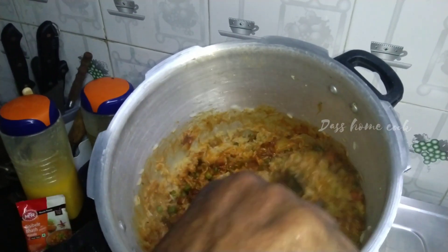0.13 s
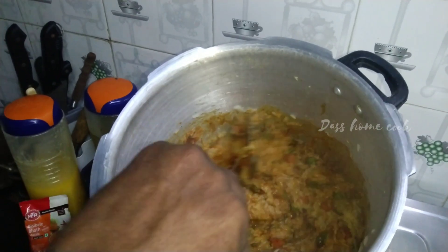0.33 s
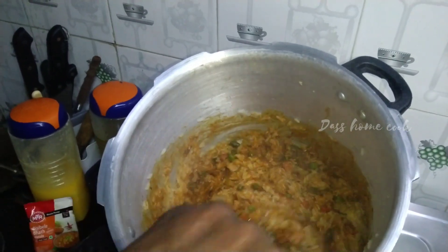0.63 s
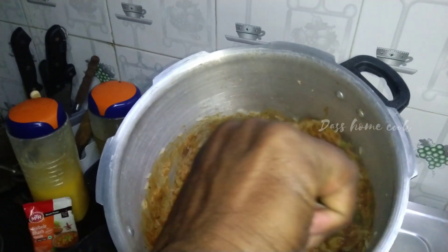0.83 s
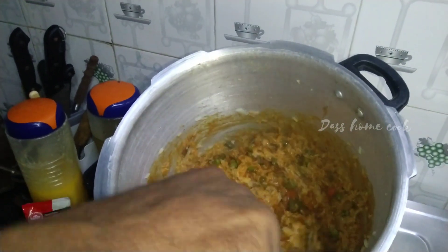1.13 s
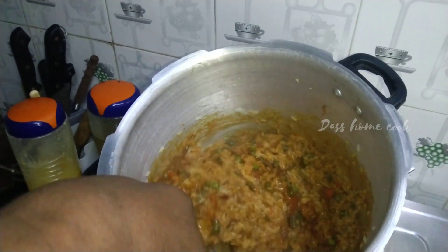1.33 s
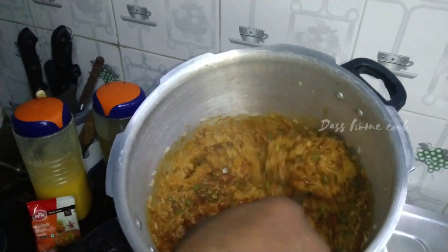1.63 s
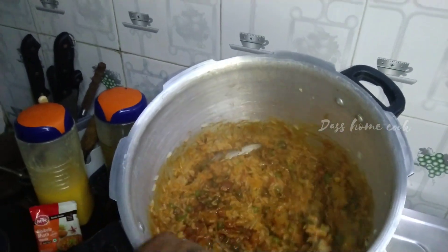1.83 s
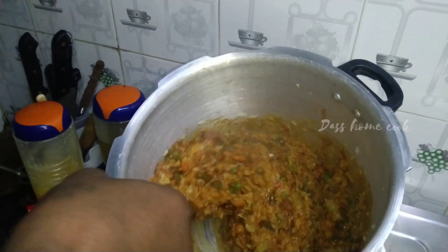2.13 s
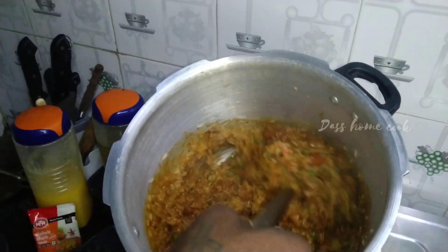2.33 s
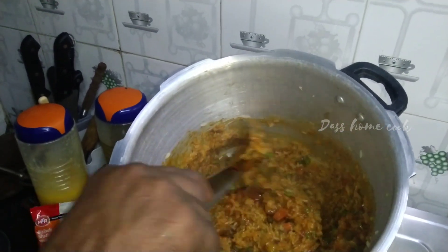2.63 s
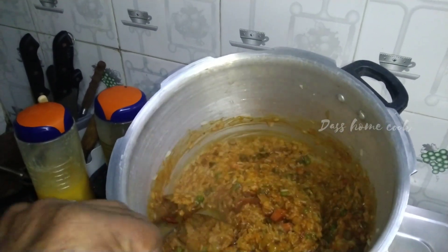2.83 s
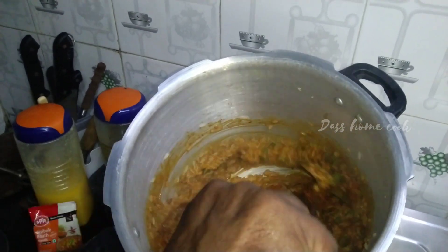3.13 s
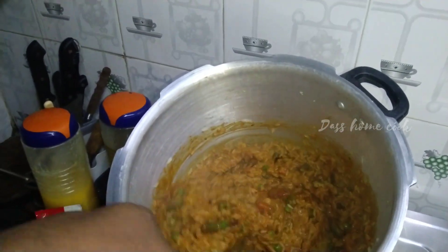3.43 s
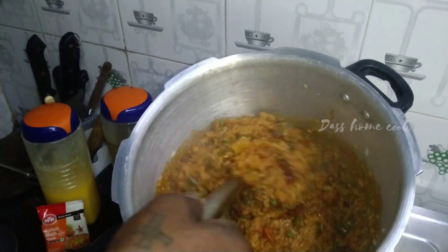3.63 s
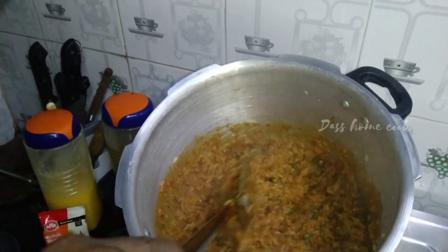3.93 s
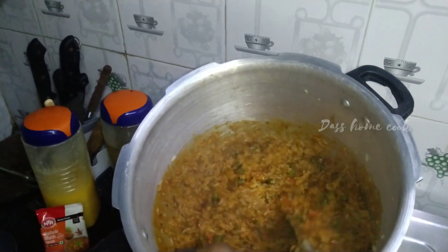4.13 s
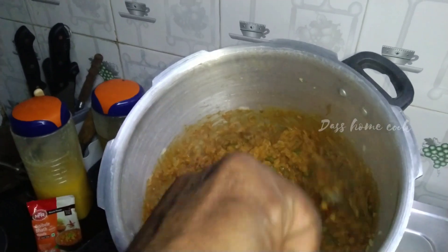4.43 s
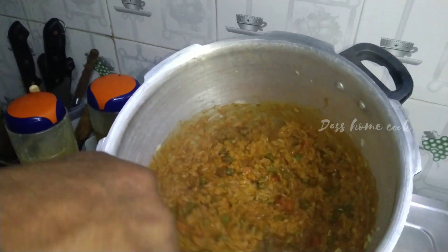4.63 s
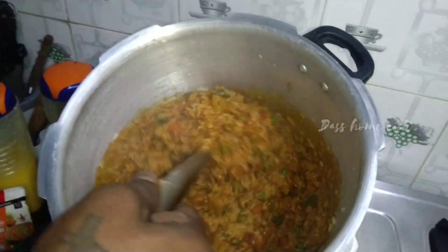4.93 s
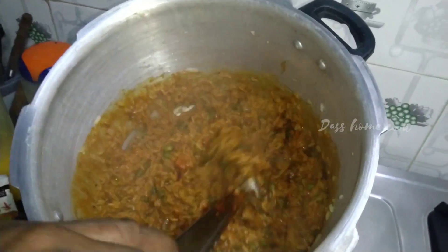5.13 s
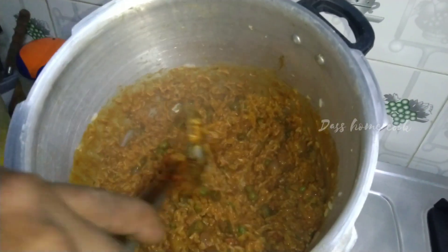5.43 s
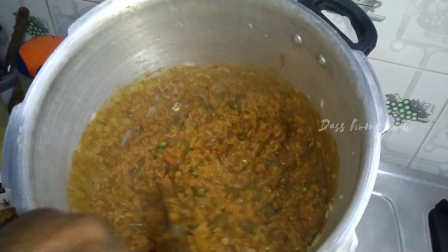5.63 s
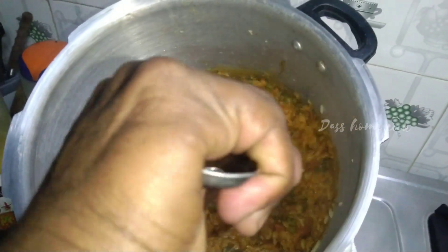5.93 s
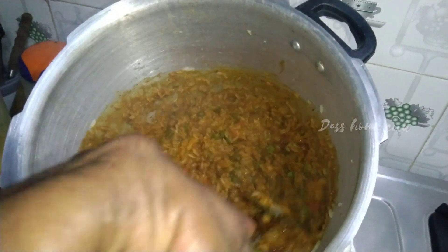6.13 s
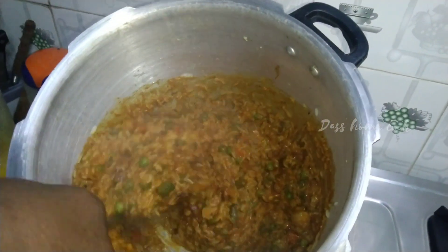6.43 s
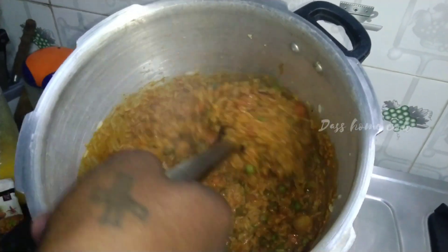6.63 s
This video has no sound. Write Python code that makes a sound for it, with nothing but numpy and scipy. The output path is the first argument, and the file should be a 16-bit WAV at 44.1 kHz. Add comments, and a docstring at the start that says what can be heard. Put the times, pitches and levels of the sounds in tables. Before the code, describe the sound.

Close by, a spoon pushes and scrapes through a moist rice mixture in a metal pot, striking the sides several times a second with short, damped clanks. Some strokes draw brief wavering tones from the pot, and the food pops faintly. The stirring eases for a moment near the end, around two very faint far crow caws, then resumes firmly. A low hum and slight buzz fill the small kitchen.

```python
"""A steel spoon stirs thick wet rice in an aluminium cooker pot, heard close by in a quiet kitchen.
Impact and friction excite the modes of the pot as the spoon knocks and drags along wall and bottom;
the food damps them, so they die fast. Soft slips of the spoon ring the low modes in short, wavering
tones, and air pockets pop between grains. Behind lie a low hum and a faint electric buzz,
and a far crow caws twice."""
import sys
import numpy as np
from scipy import signal
from scipy.fft import rfft, irfft, next_fast_len
from scipy.io import wavfile
from scipy.ndimage import uniform_filter1d, map_coordinates

SR = 44100
rng = np.random.default_rng(int(sys.argv[2]) if len(sys.argv) > 2 else 0)


def dump(signal):
    """Clip the signal to [-1, 1] and save it as 16-bit WAV at the path in sys.argv[1]."""
    limited = np.clip(np.atleast_2d(signal).T, -1, 1)
    pcm = np.round(limited * 32767).astype(np.int16)
    wavfile.write(sys.argv[1], SR, pcm)


N = 298539

# Modes of the loaded pot. Each row: frequency in Hz, relative level in dB, nominal t60 in seconds.
POT_MODES = [(276, -12, 0.035), (316.5, -6, 0.12), (425.3, -1.5, 0.21), (465, -6, 0.13),
             (489.5, -2.5, 0.12), (619, -4.5, 0.11), (690, -4.5, 0.12), (783, -5, 0.12),
             (850.5, -0.5, 0.096), (981, -0.5, 0.065), (1073, 1.5, 0.091), (1255, -8, 0.085),
             (1456, -3.5, 0.061), (1618, -8.5, 0.094), (1930, -2.5, 0.04), (2220, -2, 0.045),
             (2400, -2.5, 0.025), (2620, -2.5, 0.032), (2900, -4, 0.04), (3197, -5.5, 0.038),
             (3506, -5.5, 0.04), (3990, -13.5, 0.044)]


def amp(db):
    """Decibels as an amplitude ratio."""
    return 10 ** (np.asarray(db) / 20)


def unit(x):
    """Normalisation to unit RMS."""
    return x / np.sqrt(np.mean(x ** 2) + 1e-20)


def along(points, hz):
    """Interpolation of (Hz, value) points on a logarithmic frequency axis."""
    f, v = np.transpose(points)
    return np.interp(np.log(hz + 1), np.log(f + 1), v)


def wobble(rate):
    """Smooth random modulation: a spline through rate knots a second."""
    return map_coordinates(rng.standard_normal(int(N * rate / SR) + 4), [np.arange(N) * rate / SR])


def filtered(x, response):
    """Linear filtering: the spectrum of x times a frequency response."""
    size = next_fast_len(N + 8192)
    return irfft(rfft(x, size) * response(np.fft.rfftfreq(size, 1 / SR)), size)[:N]


def room(air_db=-48.5, hum_db=-54.0, hum_hz=96):
    """Ambient noise: bass-heavy kitchen air and a hum modulated in frequency and amplitude."""
    # Each row: frequency in Hz, relative spectral density in dB.
    air_spectrum = [(12, -52), (20, 7.5), (104, 6), (196, 3.5), (521, 1.5), (935, -8.5), (1110, -9),
                    (1680, -14), (1980, -11), (4210, -23.5), (9190, -25.5), (15600, -31.5)]
    air = unit(filtered(rng.standard_normal(N), lambda hz: amp(along(air_spectrum, hz))))
    hum = np.sin(2 * np.pi * np.cumsum(hum_hz + 11 * wobble(12)) / SR) * amp(hum_db + 3.9 * wobble(7))
    return amp(air_db + 0.2 * wobble(2.27)) * air + hum


def electric_buzz(rate_hz=122, level_db=-66):
    """A nearly periodic impulse train, high-passed to thin treble ticks, is heard as a buzz."""
    cycles = np.cumsum(rate_hz * (1 + 0.055 * wobble(2.7))) / SR
    ticks = np.diff(np.floor(cycles), prepend=0) * amp(1.5 * rng.standard_normal(N))
    return amp(level_db) * unit(filtered(ticks, lambda hz: hz ** 2 / (hz ** 2 + 8000 ** 2)))


def knocks(spot_gain_db=13, spot_octaves=0.054, lasting_share=0.088):
    """Impact excitation: a blow cracks and sets all modes ringing, weighted by the spot it strikes."""
    # Each row: start in seconds, relative level of the low boom in dB, middle clank and high clink
    # in dB relative to the boom, frequency favoured by the struck spot in Hz.
    blows = [(0.008, -10.5, -4.5, -6.5, 479), (0.285, -12.5, -5.5, -14.5, 441), (0.406, -21, -9.5, 3, 980),
             (0.606, -24.5, -7.5, 5, 1465), (0.683, -29, 0.5, -9, 1560), (1.073, -26.5, -1, -21, 1596),
             (1.188, -7.5, -4.5, -29, 407.4), (1.561, -15, -17, -21, 405), (1.679, -25, 7, -1, 690),
             (1.93, -29, -3, 3.5, 1486), (2.004, -9.5, -26, -23, 405), (2.139, -12, -5.5, -15.5, 454),
             (2.419, -19.5, 6, -10.5, 467), (2.632, -50, 16, 8, 2210), (2.933, -38, -7, -11, 442),
             (2.956, 0, -7, -12, 506.6), (3.035, -22.5, -11, -24, 443), (3.213, -24.5, -3, -14, 496),
             (3.436, -22.5, -10.5, -13, 420), (3.563, -13.5, -15, -17, 867), (3.794, -12, -4, -27.5, 469),
             (4.118, -26.5, -2.5, 3, 2620), (4.183, -15, -7.5, -16, 412), (4.475, -37.5, -4, -4, 2180),
             (4.552, -12, 0.5, -15.5, 465), (5.049, -13.5, -15, -9.5, 463), (5.075, -31, 3, -6, 464),
             (5.112, -35, 5, -4, 1290), (5.137, -38.5, 10.5, -1, 1460), (5.301, 3.5, -13, -13.5, 980),
             (5.788, -13, -17, -14, 850), (5.855, -28.5, -39, -1, 2880), (6.096, -43.5, -6, 4.5, 436),
             (6.117, -10.5, 4, 3.5, 2130), (6.184, -6.5, -10, -31, 450.4), (6.504, -17, -10.5, -9.5, 2700),
             (6.626, -0.5, -12, -17.5, 492.3), (6.692, -18.5, -7, -4, 485), (6.739, -27, 3, -3, 1500)]
    out, t = np.zeros(N + SR), np.arange(SR // 5) / SR
    hz, db, t60 = np.transpose(POT_MODES)[:, :, None]
    attack = (1 - np.exp(-t / 0.00045)) ** 2
    for start, boom_db, clank_db, clink_db, spot_hz in blows:
        crack_db = -25.5 + 0.76 * clink_db
        spectrum = [(500, 0.015), (900, clank_db + 4), (2500, clink_db + 11), (7000, crack_db + 19)]
        near_spot = np.exp(-(np.log2(hz / spot_hz) / spot_octaves) ** 2)
        mode_db = db + along(spectrum, hz) + spot_gain_db * near_spot
        # Every blow differs; the shifting food detunes the modes.
        scatter_db, phase, detune = (spread * rng.standard_normal(hz.shape) for spread in (2, .5, .015))
        partials = amp(mode_db + scatter_db) * np.sin(2 * np.pi * hz * (1 + detune) * t + phase)
        # The food absorbs most of the blow at once; a hard blow presses the spoon on and damps more.
        quick_t60 = 0.54 * t60 * amp(-0.06 * (boom_db + 9.5))
        lasting = lasting_share * (1 + 1.2 * near_spot) * amp(-60 * t / (0.65 * t60))
        ring = np.sum((amp(-60 * t / quick_t60) + lasting) * partials, axis=0)
        crack = signal.lfilter([1.3, 1.05, 0.26, -0.48, -1.44], [1, -.9, .3], rng.standard_normal(len(t)))
        crack *= amp(crack_db + 4 - 60 * t / 0.045)
        snap = signal.lfilter([1, 1, -1, -1], 2, rng.standard_normal(len(t)))  # steel meets metal
        snap *= amp(crack_db + 18.5 - 60 * t / .007)
        out[round(start * SR):][:len(t)] += amp(boom_db - 9.5) * (ring + crack + snap) * attack
    return out[:N]


def grit(slips_per_s, lumpy_db):
    """Rough contact acts as a dense random train of tiny slips whose strength comes in lumps."""
    return (rng.random(N) < slips_per_s / SR) * amp(lumpy_db * (wobble(40) + wobble(150)))


def mode(force, hz, t60):
    """Forced response of one damped harmonic oscillator."""
    radius, angle = amp(-60 / (t60 * SR)), 2 * np.pi * hz / SR
    return signal.lfilter([0, radius * np.sin(angle)], [1, -2 * radius * np.cos(angle), radius ** 2], force)


def patchy(x, depth_db):
    """Spectral modulation: patches swell and fade as wet grit comes and goes under the edge."""
    spectra = signal.stft(x, nperseg=512)[2]
    field = uniform_filter1d(rng.standard_normal(spectra.shape), size=5, axis=0)
    field = uniform_filter1d(field, size=5, axis=1)
    return signal.istft(spectra * amp(depth_db * unit(field)), nperseg=512)[1][:N]


def contact_power(rows, touch_s=0.014, lift_s=0.017):
    """Incoherent contacts add in power; returns envelopes of a main sound and its companion."""
    power, t = np.zeros((2, N)), np.arange(N) / SR
    for start, length, db, change_db, companion_db in rows:
        touch = np.clip((t - start) / touch_s + 1, 0, 1)
        lift = np.clip((start + length - t) / lift_s + 1, 0, 1)
        level_db = db + change_db * np.clip((t - start) / length, 0, 1)
        power += (touch * lift * amp(level_db + [[0], [companion_db]])) ** 2
    return power


def contact_gains(scrape_drag_db=-10.5):
    """Friction needs contact: the gains of boom, drag, edge and rasp vanish when the spoon lifts."""
    # The spoon pushes through the mass. Each row: start and length in seconds, boom level at touch
    # in dB, its change by the end in dB, drag in dB relative to the boom.
    pushes = [(.045, 0.22, -30.5, -31.5, 2.5), (.305, 0.05, -16.5, -25, -12), (.42, 0.058, -44, -6, 0),
              (.62, 0.043, -26.5, -20, -8), (.685, 0.17, -35.5, -16, -0.5), (1.075, 0.12, -45, 2, -2.5),
              (1.21, 0.2, -30, -9.5, -6), (1.395, .15, -35, -6.5, -0.5), (1.58, 0.11, -21, -20, -11),
              (1.685, 0.052, -29.5, 0, -0.5), (1.92, 0.089, -37, -11, -2), (2.012, 0.14, -34.5, -6.5, -2),
              (2.135, 0.13, -32, -3.5, -5), (2.31, 0.068, -25.5, -3.5, -12.5),
              (2.425, 0.27, -36, -19.5, -6), (2.65, 0.17, -50.5, 8.5, 8.5), (2.98, 0.11, -50, -14, 11),
              (3.07, 0.078, -39, 3.5, -2), (3.213, 0.082, -35.5, -24, 2.5), (3.29, 0.11, -43.5, -14, -2),
              (3.4, .11, -52.5, 14.5, 1.5), (3.575, 0.19, -45, 14.5, -6.5), (3.794, 0.11, -30.5, -26, -9),
              (4.135, 0.056, -31.5, -11, -5), (4.19, 0.08, -32, -21, -4.5), (4.485, 0.043, -34, -9, -1),
              (4.565, 0.36, -33.5, -1.5, -6.5), (4.92, 0.077, -46.5, 24, -10.5),
              (5.005, 0.33, -41.5, -28, 0.5), (5.33, 0.092, -40.5, -5, -3.5), (5.8, 0.063, -46, 11.5, 1),
              (6.13, 0.027, -20, -28, -22), (6.2, 0.29, -31.5, -3.5, -7), (6.52, 0.023, -28.5, -11, -4.5),
              (6.64, 0.058, -26.5, -6, -6), (6.695, 0.036, -34, -10.5, 4), (6.755, .03, -34.5, 3, 10)]
    # Its edge scrapes bare metal. Each row: start and length in seconds, edge level at touch in dB,
    # its change by the end in dB, rasp in dB relative to the edge.
    scrapes = [(.05, 0.17, -40, -15, -5), (.305, 0.14, -46.5, -15, -6.5), (.415, 0.049, -41, -4.5, -2),
               (.62, 0.067, -54, 4, -17), (.685, 0.055, -42.5, 1.5, -10.5), (.755, 0.1, -54.5, -5.5, -5),
               (1.075, 0.084, -46, 11, -6.5), (1.175, .19, -35, -3.5, -7.5), (1.375, 0.13, -43.5, -12, -11),
               (1.46, 0.08, -41.5, -2.5, -8), (1.575, 0.076, -46, -3, -7), (1.685, 0.056, -36.5, -3, -11.5),
               (1.92, 0.065, -37.5, -13, -8), (2.015, 0.1, -39.5, 3, -14.5),
               (2.135, .16, -36.5, -5.5, -7.5), (2.33, 0.048, -46, 9, -8.5),
               (2.425, 0.19, -42.5, -24, -7.5), (2.64, 0.17, -32.5, 0.5, -7.5),
               (3.03, 0.15, -43, -7.5, -7.5), (3.215, 0.048, -46, -5.5, -5.5),
               (3.285, 0.069, -40, -9, -3.5), (3.39, .12, -44.5, 7, -10.5), (3.575, 0.19, -45.5, -1.5, -9),
               (3.794, 0.047, -37.5, -17, -8), (4.13, 0.096, -35.5, -13.5, -12),
               (4.485, 0.054, -38, 3, -9.5), (4.565, 0.36, -36.5, -3, -7.5), (4.93, 0.19, -43, -10, -7.5),
               (5.8, 0.059, -44, 6, -14.5), (6.13, 0.058, -29.5, -7.5, -11.5), (6.2, 0.31, -36.5, -4, -7),
               (6.52, 0.02, -38, -1, -20), (6.645, 0.075, -46, 4.5, -12), (6.755, .03, -37.5, -11, -8)]
    boom, drag = contact_power(pushes)
    edge, rasp = contact_power(scrapes)
    drag += edge * amp(scrape_drag_db) ** 2  # a scrape shakes the middle modes too
    return np.sqrt([boom, drag, edge, rasp])


def strokes():
    """Friction excitation: pushing drives the low modes, dragging the middle, the rasping edge the high."""
    # Where the edge rings best as its angle changes. Each row: time in seconds, frequency in Hz.
    edge_path = [(.05, 2860), (.7, 2750), (1.08, 2400), (1.33, 3120), (1.45, 2480), (1.95, 2700),
                 (2.07, 2320), (2.18, 2680), (2.63, 2180), (2.68, 2530), (3.3, 2400), (3.5, 2300),
                 (4.13, 2570), (4.55, 2230), (4.85, 2810), (5.08, 2220), (5.84, 2870), (6.14, 2380),
                 (6.45, 2550)]
    # Friction noise. Each row: frequency in Hz, relative spectral density in dB.
    rasp_spectrum = [(2240, -10.5), (3800, 1), (5200, -3), (7150, -6.5), (8490, -6.5), (15200, -22)]
    # Damping by the pressing spoon: factors on t60 for the low, middle and high modes.
    pressed_decay = (.8, .5, .7)
    coarse, fine = grit(3000, lumpy_db=1.8), grit(12000, lumpy_db=1.5)
    bands, power = np.zeros((2, 3, N))
    edge_hz = np.interp(np.arange(N) / SR, *np.transpose(edge_path))
    for hz, db, t60 in POT_MODES:
        band = np.searchsorted([570, 1500], hz)
        edge_db = 11 * np.exp(-(np.log2(hz / edge_hz) / 0.22) ** 2)
        coupling = amp(db + edge_db + 3 * wobble(14))  # the contact wanders over nodes and antinodes
        force = coupling * (fine if band == 2 else coarse) * rng.standard_normal(N)
        bands[band] += mode(force, hz, pressed_decay[band] * t60)
        power[band] += coupling ** 2 * t60
    boom, drag, edge = bands / np.sqrt(power)  # the work stays the same; only its sharing moves
    edge = patchy(edge, depth_db=2)
    rasp = patchy(fine * rng.standard_normal(N), depth_db=3.6)
    rasp = filtered(rasp, lambda hz: amp(along(rasp_spectrum, hz)))
    return sum(gain * unit(x) for gain, x in zip(contact_gains(), (boom, drag, edge, rasp)))


def pops(faint_count=600):
    """Tiny air pockets burst between wet grains, each a damped, rising oscillation of a few cycles."""
    # The clearest pockets. Each row: start in seconds, relative level in dB, initial frequency in Hz.
    clear = [(0.927, -57, 2850), (0.959, -48, 7000), (0.987, -51, 4830), (1.06, -44.5, 2860),
             (1.897, -51, 2600), (2.497, -39.5, 2080), (2.605, -43, 2400), (3.987, -51, 4660),
             (4.04, -59, 3300), (4.255, -54, 6000), (5.608, -54, 2460), (5.648, -56, 2400),
             (5.696, -61, 2300), (6.0005, -49, 7900)]
    when, weakness, height = rng.random((faint_count, 3)).T
    faint = np.c_[when * N / SR, -72 - 3 * np.log(weakness + .05), 4500 * 2.6 ** height]
    start, db, hz = np.transpose(np.r_[np.array(clear), faint])[:, :, None]
    t = np.arange(256) / SR
    chirps = amp(db + 14.5) * np.sin(2 * np.pi * hz * t * (1 + 60 * t)) * np.exp(-t * hz / 3)
    samples = (start * SR).astype(int) + np.arange(256)
    return np.bincount(samples.ravel(), chirps.ravel(), N + 256)[:N]


def soft_rings(t60=0.064, attack_s=0.0086):
    """Stick-slip: soft slips of the spoon ring the low modes in short, wavering, slightly rising tones."""
    # Each row: start in seconds, relative level in dB, initial frequency in Hz.
    slips = [(1.584, -5.5, 508), (1.607, -15, 582), (1.63, -20, 668), (1.652, -21, 428),
             (2.304, -19.5, 448), (2.327, -15, 505), (2.329, -14, 701), (2.355, -16, 683),
             (2.372, -17.5, 678), (3.092, -26.5, 932), (3.12, -25, 448), (3.702, -16, 492),
             (3.745, -13, 436), (4.557, -10, 475), (4.973, -13.5, 441), (5.001, -21, 465),
             (6.293, -12, 419.4), (6.317, -11.5, 442), (6.343, -13.5, 419), (6.649, -21, 460),
             (6.664, -9.5, 417)]
    out, t = np.zeros(N + SR), np.arange(SR // 8) / SR
    for start, db, hz in slips:
        phase_jitter = .7 * map_coordinates(rng.standard_normal(16), [t * 90])
        tone = np.sin(2 * np.pi * hz * t * (1 + 0.61 * t) + phase_jitter)
        envelope = amp(db + 7 - 60 * t / t60) * (1 - np.exp(-t / attack_s))
        out[round(start * SR):][:len(t)] += envelope * tone
    return out[:N]


def crow(attack_s=0.013, echo_t60=0.54):
    """Source and filter: hoarse pulses pass through the throat's formants and fade as far echoes do."""
    # Each row: start and length in seconds, relative level in dB, initial pitch in Hz.
    caws = [(5.165, 0.072, -49.5, 436), (5.448, 0.2, -50, 448)]
    # Each row: centre frequency in Hz, width in Hz, relative gain in dB.
    formants = [(1400, 300, -2), (1750, 200, -7.5)]
    t, voice = np.arange(N) / SR, np.zeros(N)
    for start, length, db, hz in caws:
        cycles = np.cumsum(hz * (1 - 0.13 * (t - start) + .012 * wobble(60))) / SR
        pulses = np.diff(np.floor(cycles), prepend=0) * 9 + 1.3 * rng.standard_normal(N)
        attack = np.clip((t - start) / attack_s, 0, 1)
        decay = amp(-60 * np.clip(t - start - length, 0, 9) / echo_t60)
        voice += amp(db) * attack * decay * pulses

    def throat(hz):
        return sum(amp(db) * (hz * width / (centre ** 2 - hz ** 2 + 1j * hz * width)) ** 2
                   for centre, width, db in formants)
    return amp(16) * filtered(voice, throat)


def reverberation(x, delay_samples=300):
    """Reflections from tiled walls form a diffuse tail in which higher frequencies die sooner."""
    # Each row: frequency in Hz, t60 in seconds.
    decay_times = [(200, 0.24), (1000, 0.12), (4000, 0.065), (12000, 0.012)]
    hz, t, spectra = signal.stft(rng.standard_normal(SR // 2), SR, nperseg=256)
    tail = signal.istft(spectra * amp(-60 * t / along(decay_times, hz)[:, None]), SR, nperseg=256)[1]
    return signal.fftconvolve(np.pad(x, (delay_samples, 0)), tail / np.linalg.norm(tail))[:N]


def scene():
    """Superposition of the pot, its reverberation and the background, in one channel."""
    pot = strokes() + knocks() + soft_rings() + pops()
    pot = filtered(pot, lambda hz: (1j * hz / (1j * hz + 150)) ** 2)  # too small to radiate deep bass
    return (pot + amp(-15.5) * reverberation(pot) + room() + electric_buzz() + crow())[None]


def record(dry, top_hz=15700):
    """Soft saturation rounds off the loudest blows; a low-pass filter limits the bandwidth."""
    clipped = dry[0] / (1 + np.abs(dry[0]) ** 8) ** (1 / 8)
    return filtered(clipped, lambda hz: hz < top_hz)[None]


dry = scene()
out = record(dry)
dump(out)
```